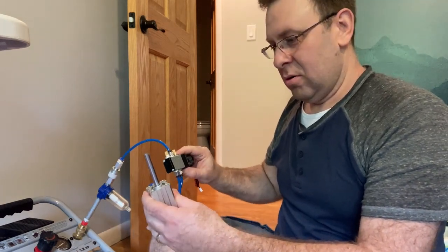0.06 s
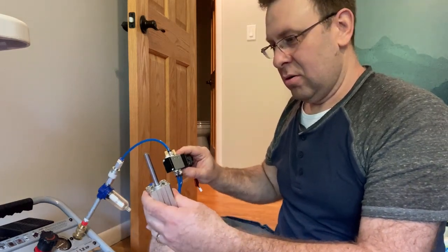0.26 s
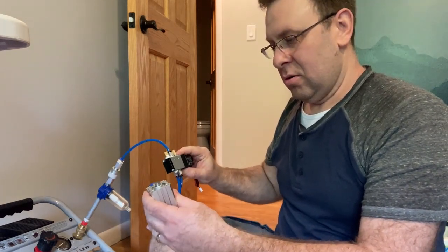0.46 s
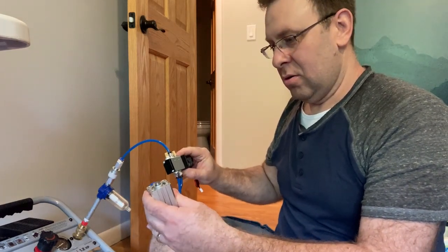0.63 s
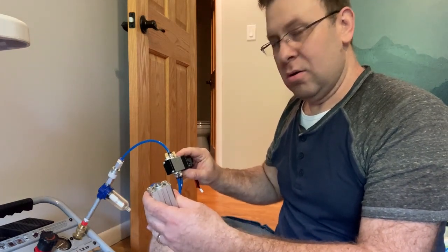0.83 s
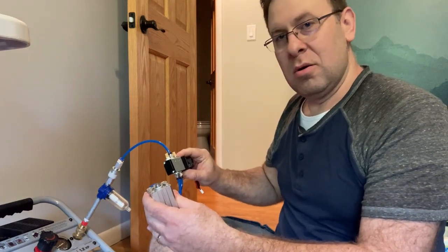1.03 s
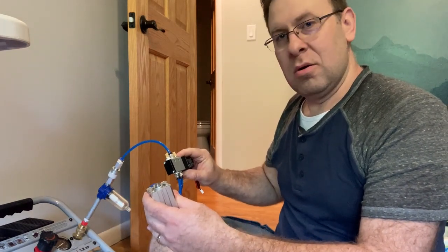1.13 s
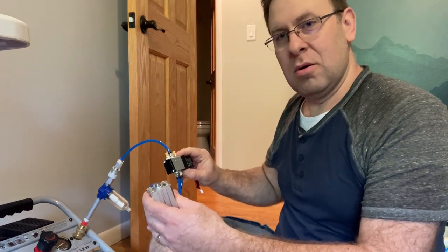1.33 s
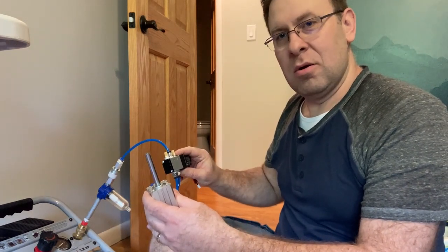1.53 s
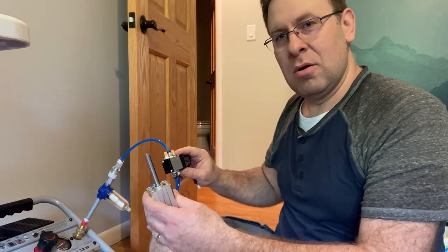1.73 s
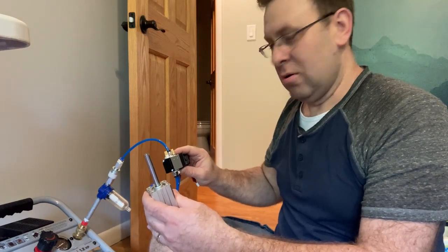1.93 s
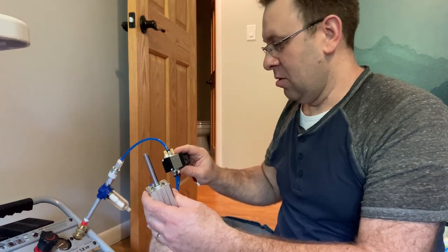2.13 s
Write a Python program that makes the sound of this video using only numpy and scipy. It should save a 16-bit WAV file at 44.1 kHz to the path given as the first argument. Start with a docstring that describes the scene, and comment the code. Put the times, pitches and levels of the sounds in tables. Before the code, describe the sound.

Close stereo pickup of a small pneumatic piston indoors: pop, hiss and a tight double knock, then a second later a stronger air spurt, pop and single hard clack, each dying quickly in a short room tail.

```python
"""A hand-held air cylinder pulls in and shoots out again, close by in a small room.
Over a low rumble the last of an earlier exhaust hiss fades; then the solenoid valve opens with a pop (damped
pulse and dark puff), exhaust air hisses (filtered noise) and the piston slams into its end cap in two quick
blows (knock, crack and ringing modes). A louder spurt of air, a second pop, hiss and a single slam follow.
Pops and slams also set off low booms, and the room answers the near sounds with a tail of decaying noise."""
import sys
import numpy as np
from scipy import signal
from scipy.fft import rfft, irfft
from scipy.io import wavfile
from scipy.ndimage import uniform_filter1d

SR = 44100
rng = np.random.default_rng(int(sys.argv[2]) if len(sys.argv) > 2 else 0)


def materialize(psi):
    """Save the field psi as 16-bit PCM at rate SR to the path in sys.argv[1].

    A 1-D psi becomes a single channel; in a 2-D psi each row is a channel.
    """
    bounded = np.clip(np.atleast_2d(psi).T, -1, 1)
    quanta = np.round(bounded * 32767).astype(np.int16)
    wavfile.write(sys.argv[1], SR, quanta)


N = 95476

# Valve openings; levels are relative within each layer. Each row: start in seconds, pop level in dB,
# pop pitch in Hz, boom level in dB, hiss level in dB, hiss sag in dB per second, exhaust length in seconds.
VALVE_OPENINGS = [(0.3909, 1, 880, 2.5, -15.5, 15, 0.12), (1.4464, 5.5, 464.5, 5, -9, 76, .075)]
# Blows of the piston on its end cap; levels are relative within each layer. Each row: start in seconds,
# crack level in dB, crack decay in seconds, knock level in dB, ring level in dB,
# frequency near which modes ring best in Hz, thud level in dB.
PISTON_BLOWS = [(0.4907, -6, .0015, -6.5, -5.5, 3200, -9.5), (0.4931, -1, .003, -4, -0.5, 3330, -4.5),
                (1.5198, 0.5, 0.0016, -1, 6, 4430, 4.5)]


def undb(db):
    """Amplitude gain from decibels: twenty decibels per factor of ten."""
    return 10 ** (np.asarray(db) / 20)


def curve(points, hz):
    """Piecewise-linear interpolation along a logarithmic frequency axis."""
    f, v = np.array(points, float).T
    return np.interp(np.log(np.maximum(hz, 1)), np.log(f), v)


def bins(size):
    """Frequencies in Hz of the discrete Fourier transform of a real signal."""
    return np.fft.rfftfreq(size, 1 / SR)


def colour(x, points, size=4096):
    """Minimum-phase filtering: folding the cepstrum makes the wanted spectrum causal."""
    cepstrum = irfft(np.log(undb(curve(points, bins(size)))))
    cepstrum[1:size // 2] *= 2
    cepstrum[size // 2 + 1:] = 0
    impulse_response = irfft(np.exp(rfft(cepstrum)))
    return signal.fftconvolve(x, impulse_response)[:N]


def since(start):
    """Elapsed time in seconds from an onset, held at zero before it."""
    return np.maximum(np.arange(N) / SR - start, 0)


def burst(start, decay_s):
    """Impulsive turbulence: white noise with an abrupt onset and exponential decay."""
    t = since(start)
    return (t > 0) * np.exp(-t / decay_s) * rng.standard_normal(N)


def pulse(start, hz, decay_s):
    """Damped oscillation: a sinusoidal pressure pulse under exponential decay."""
    t = since(start)
    return np.sin(2 * np.pi * hz * t) * np.exp(-t / decay_s)


def ring(start, modes, rise_s, spread=0):
    """Modal superposition: damped sinusoids of random phase, the channels apart by the spread in radians."""
    t = since(start)
    sides = np.array([[1], [-1]]) * spread / 2 if spread else 0
    total = 0
    for hz, db, t60 in modes:
        decay = np.exp(-np.log(1000) * t / t60)  # 60 dB down after t60
        phase = 2 * np.pi * (hz * t + rng.random()) + sides * rng.choice([-1, 1])
        total = total + undb(db) * decay * np.sin(phase)
    return (1 - np.exp(-t / rise_s)) * total


def diffuse():
    """Diffuse-field coherence: spectra of two noises whose correlation varies with frequency."""
    # Each row: frequency in Hz, correlation between the channels (1 is identical).
    likeness = [(60, 0.55), (250, 0.57), (600, 0.65), (1200, -0.059), (2500, -.25), (5000, 0.083),
                (7000, -0.39), (8600, 1), (10000, 0.61), (11400, 1), (12700, 0.44), (14000, 1)]
    alike = np.clip(curve(likeness, bins(N)), -1, 1)
    mid, side = rfft(rng.standard_normal((2, N)))
    signs = np.array([[1], [-1]])
    return (mid * np.sqrt(1 + alike) + side * np.sqrt(1 - alike) * signs) / np.sqrt(2)


def rumble():
    """Stationary diffuse background: low steady noise of the house with a faint hiss."""
    # Each row: frequency in Hz, relative level in dB.
    rumble_spectrum = [(20, -7.5), (38, -0.5), (58, 13.5), (80, 7), (130, -2), (220, -9.5), (400, -7.5),
                       (800, -17), (2000, -22.5), (6300, -31), (8500, -27.5), (11500, -29), (15000, -31.5)]
    overall_db = -37
    return irfft(diffuse() * undb(overall_db + curve(rumble_spectrum, bins(N))), N)


def spurts():
    """Decaying jet noise: the fading end of an earlier hiss, then an escape of air at the valve."""
    # Each row: start in seconds, relative level in dB, decay in seconds.
    spurt_events = [(0., -39.5, 0.017), (1.4343, -12, 0.018)]
    # Each row: frequency in Hz, relative level in dB.
    spurt_spectrum = [(60, -26), (250, -6), (600, -14), (1000, -12), (1550, -6.5), (2500, -10), (3800, 2),
                      (6500, -4), (10000, 2), (14500, 4)]
    air = sum(undb(db) * burst(start, decay_s) for start, db, decay_s in spurt_events)
    return colour(air, spurt_spectrum)


def room(x, count=10):
    """Frequency-dependent reverberation: dense reflections from near walls as decaying bands of noise."""
    # Each row: frequency in Hz, time to fall by 60 dB in seconds.
    reverberation_times = [(80, 0.11), (250, 0.43), (1000, 0.26), (2400, .33), (4400, .31), (8000, 0.24),
                           (14000, 0.16)]
    level_db, gap_s, rise_s = -3, 0.0013, 0.0018
    t, noise, tail = since(gap_s), diffuse(), 0
    centres = np.geomspace(60, 15000, count)  # Hz
    for hz, share in zip(centres, np.eye(count)):
        # Overlapping triangular bands on the logarithmic axis
        band_gain = curve(list(zip(centres, share)), bins(N))
        band = irfft(noise * band_gain, N)
        tail = tail + band * np.exp(-np.log(1000) * t / curve(reverberation_times, hz))
    tail = tail * (1 - np.exp(-t / rise_s))
    tail = tail / np.sqrt(np.sum(tail ** 2) / 2)  # unit mean energy per channel
    return undb(level_db) * signal.fftconvolve(x[None], tail, axes=1)[:, :N]


def valve():
    """Sudden pressure release: the opening port gives one damped pulse and a dark puff of air."""
    # Each row: frequency in multiples of the pop pitch, relative level in dB.
    puff_spectrum = [(.05, -23), (.12, -11.5), (.3, 7.5), (.8, 11.5), (1.4, 12), (2.1, 5.5), (2.8, 2.5),
                     (6, -7), (25, -16)]
    pop_db, pop_decay_s = 2, 0.0005
    puff_db, puff_decay_s = -5, 0.0054
    out = 0
    for start, db, hz, *_ in VALVE_OPENINGS:
        scaled_spectrum = [(multiple * hz, level) for multiple, level in puff_spectrum]
        puff = colour(burst(start, puff_decay_s), scaled_spectrum)
        out = out + undb(db + pop_db) * pulse(start, hz, pop_decay_s)
        out = out + undb(db + puff_db) * puff
    return out


def exhaust():
    """Turbulent jet noise: exhaust air surges as the port opens, sags with the pressure and shuts off."""
    # Each row: frequency in Hz, relative level in dB.
    hiss_spectrum = [(40, -21), (200, -5.5), (700, -14.5), (1500, -2), (3100, -4.5), (4100, 1.5), (4850, 4),
                     (5700, -0.5), (7000, 0.5), (8500, .5), (10500, -3.5), (12500, -5.5), (15000, -3.5)]
    attack_s, release_s = 0.0024, 0.0043
    surge_db, surge_s = 5, 0.016  # the jet is strongest just after the port opens
    flutter_db, flutter_s = 0.7, 0.0022  # RMS depth, averaging time
    flow = 0
    for start, _, _, _, db, sag, length in VALVE_OPENINGS:
        t = since(start)
        gate = (1 - np.exp(-t / attack_s)) * np.exp(-since(start + length) / release_s)
        level_db = db + surge_db * np.exp(-t / surge_s) - sag * t
        flow = flow + gate * undb(level_db)
    flutter = uniform_filter1d(rng.standard_normal(N), max(int(flutter_s * SR), 1))
    flutter_gain = undb(flutter_db * flutter / flutter.std())
    return colour(flow * flutter_gain * rng.standard_normal(N), hiss_spectrum)


def booms():
    """Low-frequency resonance: room modes build up after each pop, dull thuds after each slam."""
    # Low modes of the room. Each row: frequency in Hz, relative level in dB, 60 dB decay in seconds.
    room_modes = [(61.8, -18, .17), (90, -14.5, .13), (175, -22, 0.064), (239.7, -28, 0.45),
                  (410, -22.5, 0.11), (492, -17, 0.068), (635, -20.5, 0.14), (675, -23, 0.076)]
    # Cylinder in the hand. Each row: frequency in Hz, relative level in dB, 60 dB decay in seconds.
    thud_modes = [(64, -25, 0.28), (106, -29.5, 0.16), (170, -21.5, 0.093), (238.7, -15.5, 0.21),
                  (269.9, -25.5, .06), (682, -23, 0.13), (770, -27, 0.048)]
    boom_rise_s, thud_rise_s = 0.0017, 0.004
    spread_rad = 0.6  # between the channels
    out = 0
    for start, _, _, db, *_ in VALVE_OPENINGS:
        out = out + undb(db) * ring(start, room_modes, boom_rise_s, spread_rad)
    for start, *_, db in PISTON_BLOWS:
        out = out + undb(db) * ring(start, thud_modes, thud_rise_s, spread_rad)
    return out


def piston():
    """Impact excitation: each blow knocks, cracks and rings the metal modes that its end cap favours."""
    # Cylinder body and rod. Each row: frequency in Hz, relative level in dB, 60 dB decay in seconds.
    body_modes = [(1332, -33, .12), (1523, -29.5, .12), (1954, -29, 0.37), (2579, -37, .15),
                  (2945, -34, 0.16), (3391, -42.5, 0.29), (3570, -34.5, 0.057), (3660, -28.5, 0.14),
                  (4339, -32, .14), (4970, -34.5, 0.12), (8576, -31, .13)]
    # Each row: frequency in Hz, relative level in dB.
    crack_spectrum = [(60, -21.5), (300, -1.5), (700, 3), (1400, 3.5), (2400, 1), (3600, 4.5), (4600, -4),
                      (6200, -11.5), (8500, -2), (15000, -8)]
    knock_hz, knock_decay_s = 1330, 0.00071
    ring_rise_s, fall_db_per_octave = 0.002, 8.5
    out = 0
    for start, crack_db, crack_s, knock_db, ring_db, best_hz, _ in PISTON_BLOWS:
        modes = [(hz, level - fall_db_per_octave * abs(np.log2(hz / best_hz)), t60)
                 for hz, level, t60 in body_modes]
        out = out + undb(crack_db) * colour(burst(start, crack_s), crack_spectrum)
        out = out + undb(knock_db) * pulse(start, knock_hz, knock_decay_s)
        out = out + undb(ring_db) * ring(start, modes, ring_rise_s)
    return out


def scene():
    """Superposition: direct sound of valve, air and piston, plus reverberation, booms and rumble."""
    near = valve() + exhaust() + spurts() + piston()
    return near + room(near) + booms() + rumble()


def record(dry):
    """Two-microphone transduction: phase and level differences, soft saturation and a limited band."""
    # Each row: frequency in Hz, phase lead of the left channel in radians (negative: the right leads).
    port_phase = [(5200, 0), (6000, -3.1), (7000, -4.1), (8300, -6.2), (9300, -6.35), (11350, -9.4),
                  (13300, -12.5), (14200, -12.65), (16000, -15.6)]
    # Each row: frequency in Hz, surplus of the left channel over the right in dB.
    balance = [(60, -0.5), (130, 2.5), (250, 3), (500, 2), (1000, 0.5), (2200, -1.3), (8000, 0.06)]
    low_cut_hz, top_hz = 45, 15600
    ceiling = 1.1  # amplitude that rounded peaks approach
    hz = bins(2 * N)
    low_cut = signal.butter(2, low_cut_hz, "high", fs=SR, output="sos")
    left, right = rfft(signal.sosfilt(low_cut, dry), 2 * N)
    lean = undb(curve(balance, hz) / 2)  # half the surplus on each side
    lag = np.exp(-1j * np.interp(hz, *np.array(port_phase).T))
    ports = irfft(np.array([left * lean, right * lag / lean]))[:, :N]
    rounded = ceiling * np.tanh(ports / ceiling)
    top_cut = signal.ellip(8, 0.2, 70, top_hz, fs=SR, output="sos")
    return signal.sosfilt(top_cut, rounded)


dry = scene()
out = record(dry)
materialize(out)
```